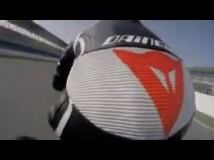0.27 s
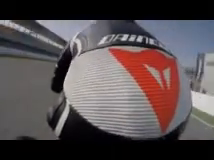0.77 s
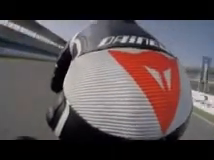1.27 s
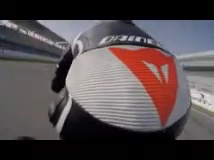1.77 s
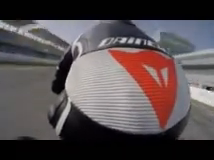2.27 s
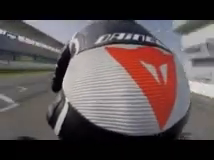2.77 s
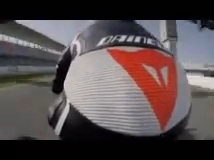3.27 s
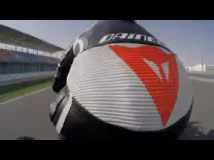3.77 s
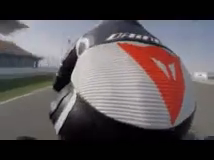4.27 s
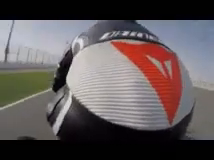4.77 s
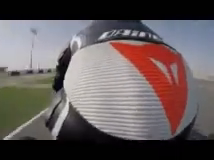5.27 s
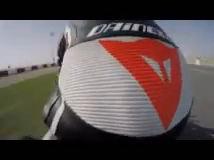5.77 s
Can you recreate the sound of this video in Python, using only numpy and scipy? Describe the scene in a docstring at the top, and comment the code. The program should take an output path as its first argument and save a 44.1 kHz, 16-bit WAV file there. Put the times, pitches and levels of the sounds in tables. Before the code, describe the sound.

A four-cylinder racing motorcycle runs flat out along a track straight, heard close from a microphone on its tail. From the start the engine holds a high, raspy scream that rises slightly, with roaring exhaust gas. Low, uneven wind thumps and mount vibration lie underneath throughout, along with a clutch hum, a faint chain whine and a light hiss of air. At about 0.9 seconds a quick upshift briefly cuts the note, the exhaust gives a sharp bang, and the engine returns at a lower pitch. From 1 to 5.5 seconds it pulls steadily, climbing very slowly with a slight wobble. At about 5.6 seconds the throttle shuts, then half reopens. The engine turns duller and burbles as its pitch falls, with short ringing tones flaring out. A softer bang comes at about 5.9 seconds as the wind grows stronger.

```python
"""A four-cylinder racing motorcycle speeds down a straight, heard from a microphone on its tail.
From the start, wind hisses and thumps, the rear wheel shakes the mount, the clutch hums, the chain
whines and gas roars, while the firing cylinders ring the exhaust pipes. Just before 1 s a quick
upshift cuts the ignition: the pitch drops, unburnt fuel bangs, and the revs slowly climb again.
At 5.6 s the throttle shuts, then half reopens; single tones flare as the revs fall, with one more bang."""
import sys
import numpy as np
from scipy import signal
from scipy.fft import rfft, irfft, next_fast_len
from scipy.io import wavfile

SR = 44100
rng = np.random.default_rng(int(sys.argv[2]) if len(sys.argv) > 2 else 0)


def wav_record(signal):
    """Record a signal, one row per channel, as 16-bit PCM in the file named by sys.argv[1]."""
    frames = np.transpose(np.atleast_2d(signal))
    bounded = np.clip(frames, -1, 1)
    # unit amplitude maps onto the largest positive 16-bit level
    quanta = np.round(bounded * 32767).astype(np.int16)
    wavfile.write(sys.argv[1], SR, quanta)


N = 265923
TIME = np.arange(N) / SR
FIRINGS = 4  # in one engine cycle, each cylinder fires once


def undb(db):
    """Turn decibels into a number to multiply by."""
    return 10 ** (np.asarray(db) / 20)


def curve(table, at=TIME):
    """Join a table's points with straight lines and read them off, by default over time."""
    return np.interp(at, *np.transpose(table))


def unit(x):
    """Scale a signal to an average size (rms) of 1."""
    return x / np.sqrt(np.mean(x ** 2))


def wander(rate):
    """A random drift of size 1 that heads for a new value rate times a second."""
    points = rng.standard_normal(2048)
    return unit(np.interp(TIME * rate, np.arange(len(points)), points))


def noise(spectrum):
    """Noise of size 1, shaped by points of (frequency [Hz], relative level [dB])."""
    hz, db = np.transpose(spectrum)
    size = next_fast_len(N)
    bins = np.maximum(np.fft.rfftfreq(size, 1 / SR), 1)
    gain = undb(np.interp(np.log(bins), np.log(hz), db))
    return unit(irfft(rfft(rng.standard_normal(size)) * gain, size)[:N])


def angle(hz):
    """The angle, in radians, of something that turns hz times a second."""
    return 2 * np.pi * np.cumsum(hz) / SR


# tone of the rushing air: (frequency [Hz], relative level [dB])
HISS_TONE = [(700, -24.5), (2000, -5.5), (3800, 3), (5500, -6.5), (6800, -7), (8300, -22)]

def air_hiss():
    """Air hisses steadily over the bike's bodywork."""
    return undb(-46) * noise(HISS_TONE)


# road speed, as turns of the rear wheel: (time [s], turning rate [Hz])
WHEEL_SPEED = [(0, 36.05), (.85, 37.9), (1.8, 38.05), (3.7, 39.68), (5.5, 40.5), (6.03, 40.16)]

def wheel_angle():
    """The rear wheel rolls along, setting the pace of the shaking and the chain."""
    return angle(curve(WHEEL_SPEED))


# strength of the wind and the mount's shaking, with a thump as the drive takes up after the shift near 0.92 s:
# (time [s], relative level [dB])
WIND_AND_SHAKE_LEVEL = [(0.0, -23.5), (.885, -23.5), (.925, -16), (.965, -26.5), (1.39, -23), (1.48, -18.5),
                        (1.58, -24), (2.47, -21.5), (2.69, -29.5), (2.74, -21), (3.01, -27.5), (3.06, -19),
                        (3.32, -28), (3.37, -24), (5.57, -21), (5.71, -19.5), (5.78, -30), (5.84, -18), (6.03, -15.5)]
# tone of wind on the microphone: (frequency [Hz], relative level [dB])
WIND_TONE = [(12, -29), (24, -11), (38, 4.5), (50, -3), (65, -3), (85, -7), (115, -7), (150, -23),
             (250, -38), (600, -86)]

def wind_and_shake(wheel):
    """Swirls of air hit the microphone while the rear wheel shakes its mount unevenly."""
    swirls = undb(-0.23 + 0.24 * wander(23)) * noise(WIND_TONE)
    sway = 1.1 * wander(8)
    shake = undb(-9.5 + 2 * wander(7.6)) * np.sin(wheel + sway)
    gust_db = -wander(9.5)
    return undb(curve(WIND_AND_SHAKE_LEVEL) + gust_db) * (swirls + shake)


def chain_whine(wheel, throttle, teeth=42):
    """The chain's rollers strike the teeth on the rear wheel fast enough to make a tone."""
    strength = undb(-38.5 + 2.4 * wander(17)) * throttle
    return strength * np.sin(teeth * wheel + 0.84 * wander(30))


# hum from the load on the clutch: (time [s], level [dB])
CLUTCH_LEVEL = [(0, -27.5), (.9, -27.5), (1.3, -24), (1.7, -26.5), (5.5, -29.5), (5.8, -26), (6.03, -36)]

def clutch_hum(cycle, turns_per_cycle=1.29):
    """The spinning clutch hums through the frame."""
    strength = undb(curve(CLUTCH_LEVEL) + 0.28 * wander(18)) * np.sqrt(2)
    return strength * np.sin(turns_per_cycle * cycle + 0.13 * wander(27))


# the rider's hand and the ignition cut: (time [s], throttle [0 shut to 1 open])
THROTTLE_MOVES = [(0, 0.88), (.826, 0.87), (.845, 0.08), (.904, 0.2), (.908, 0.81), (.96, 0.8), (2.5, 0.8),
                  (5.56, 0.87), (5.59, 0.6), (5.612, 0.1), (5.67, 0.28), (5.73, 0.5), (5.82, 0.4),
                  (5.88, 0.57), (5.98, 0.4), (6.03, 0.5)]

def throttle_opening():
    """How hard the engine is asked to pull."""
    return np.clip(curve(THROTTLE_MOVES), 0, 1)


# engine speed through two gears and the slowing at the end: (time [s], cycle rate [Hz])
ENGINE_REVS = [(0, 100.9), (.23, 101.3), (.4, 102.8), (.6, 102.9), (.76, 104.6), (.826, 104), (.884, 92.5),
               (.9, 87.5), (.922, 93.7), (.976, 91.6), (1.42, 92.8), (2, 93.8), (2.42, 94.85),
               (2.67, 94.85), (2.8, 95.6), (3.9, 96.8), (4.25, 97.75), (4.58, 98), (4.75, 98.9),
               (5.57, 99.9), (5.62, 95.4), (5.8, 94.1), (5.856, 91.2), (5.906, 86.9), (5.985, 79.7),
               (6.03, 77.5)]
# jolts to the springy drive: (time [s], first swing in cycle rate [Hz], wobble rate [Hz], fade time [s])
DRIVE_JOLTS = [(.98, -.8, 9.4, .35), (2.754, .8, 9.27, 1.3)]

def engine_speed():
    """Engine cycles per second, with a wobble that dies away after each jolt."""
    hz = curve(ENGINE_REVS)
    for start, swing_hz, wobble_hz, fade in DRIVE_JOLTS:
        age = np.maximum(TIME - start, 0)
        hz += (TIME >= start) * swing_hz * np.exp(-age / fade) * np.cos(2 * np.pi * wobble_hz * age)
    return hz


# bangs in the pipe: (time [s], level [dB], fade time [s])
FUEL_BANGS = [(.906, -17, .011), (5.912, -28, .025)]
# tone of a bang: (frequency [Hz], relative level [dB])
BANG_TONE = [(30, 0), (110, 1), (300, -1), (900, -3), (1400, -9), (2200, -5), (3700, -10.5),
             (6000, -24), (8000, -45)]

def fuel_bangs(rise_s=.0015):
    """Unburnt fuel goes off in the pipe with a short bark."""
    loudness = np.zeros(N)
    for start, db, fade in FUEL_BANGS:
        age = np.maximum(TIME - start, 0)
        loudness += undb(db) * np.minimum(age / rise_s, 1) * np.exp(-age / fade)
    return loudness * noise(BANG_TONE)


# strength of the gas flow: (time [s], relative level [dB])
GAS_LEVEL = [(0, -33.5), (.85, -34), (1.2, -33), (2.4, -34.5), (4.8, -33.5), (6.03, -32)]
# tone of the gas with the throttle open, and shut: (frequency [Hz], relative level [dB])
GAS_TONE_OPEN = [(150, -8), (280, -11), (450, -4.5), (900, -4.5), (1200, -7), (1500, -9.5), (1880, 3),
                 (2450, 0.5), (2900, -7), (3350, -15.5), (3850, -9), (4900, -19), (6300, -21.5),
                 (7200, -29.5), (8300, -41.5)]
GAS_TONE_SHUT = [(150, -8), (300, -8.5), (550, -9.5), (900, -2.5), (1300, -13.5), (1600, -12), (1950, -4.5),
                 (2400, -15.5), (2800, -21.5), (3900, -17), (5200, -39), (6200, -33), (8200, -60)]

def gas_roar(cycle, throttle):
    """Churning gas leaves in puffs, one per firing; it turns dull and burbles as the throttle shuts."""
    puffs = 1 + 0.2 * np.cos(FIRINGS * cycle) + 0.15 * np.cos(2 * cycle) + 0.046 * np.cos(cycle)
    gas = noise(GAS_TONE_OPEN)
    one_cycle_ago = np.interp(cycle - 2 * np.pi, cycle, gas, left=0)
    pulling = throttle * unit(gas + .4 * one_cycle_ago)  # each cycle partly repeats the last
    coasting = undb(2.5 + wander(70)) * (1 - throttle ** 2) * noise(GAS_TONE_SHUT)
    level_db = curve(GAS_LEVEL) + 8 - 11 * (1 - throttle) ** 2 + 0.49 * wander(25)
    return undb(level_db) * puffs * (pulling + coasting)


# An "order" is a tone at a whole number times the cycle rate. A resonance is a pitch a pipe rings at.
# All five tables list resonances: (frequency [Hz], width [Hz], relative level [dB])
# the silencer and tail pipe, shared by all orders
SILENCER = [(198, 63, -38), (532, 240, -36), (1554, 204, -45.5), (2700, 3600, -56.5), (3760, 110, -56),
            (4140, 210, -54)]
# where the pipes join, rung by all four cylinders in step (orders 4, 8, 12 ...)
PIPE_JOINT = [(748, 36, -30.5), (777, 35.4, -29), (831, 14, -31.5), (1098, 53, -34), (1253, 19, -41),
              (1473, 81, -41), (1620, 56, -36), (1904, 92, -24.5), (2077, 48, -34.5), (2266, 150, -34.5),
              (2610, 70, -42), (2790, 150, -43), (3664, 61, -44), (3840, 140, -46.5), (4310, 130, -46)]
# the front pipes, rung by the two cylinder pairs against each other (orders 1, 5, 9 ...)
PAIRS_OPPOSED = [(880.3, 74, -33.5), (896, 41, -32.5), (1329, 123, -36.5), (1600, 150, -47.5),
                 (1810, 36, -42), (1927, 26, -28), (2037, 75, -36.5), (2200, 100, -37.5), (2466, 97, -30.5),
                 (2555, 37, -42), (3820, 130, -51)]
# the front pipes, with the pairs in step (orders 2, 6, 10 ...)
PAIRS_IN_STEP = [(559, 29, -36), (938, 87, -31), (974, 42, -36), (1380, 69, -43.5), (1836, 132, -28),
                 (2008, 77, -31.5), (2285, 155, -32.5), (2449, 72, -30.5), (2615, 220, -39.5),
                 (3825, 150, -43)]
# the front pipes, with the pairs opposed the other way round (orders 3, 7, 11 ...)
PAIRS_REVERSED = [(277, 12, -42), (328, 11, -44), (646.5, 75, -33.5), (708, 34, -32), (1133, 140, -37),
                  (1820, 110, -37.5), (2110, 79, -33.5), (2231, 120, -31.5), (2410, 44, -39),
                  (2500, 56, -33.5), (2650, 160, -40), (3780, 191, -45.5)]

def pipe_gain(order, cycle_hz):
    """The pipes make an order louder as its pitch passes through one of their resonances."""
    pipes = (PIPE_JOINT, PAIRS_OPPOSED, PAIRS_IN_STEP, PAIRS_REVERSED)[order % FIRINGS]
    hz = np.linspace(50, 9000, 4096)
    power = 0
    for centre, width, db in [*SILENCER, *pipes]:
        off_centre = (hz / centre - centre / hz) * centre / width
        power += (undb(db) / (1 + off_centre ** 2)) ** 2
    return np.interp(order * cycle_hz, hz, np.sqrt(power))


# orders that ring out as the falling revs pass a resonance:
# (time [s], order [number], relative level [dB], half length [s])
ORDER_FLARES = [(.85, 8, -27, .014), (.875, 8, -31, .012), (.862, 10, -32, .014), (5.738, 8, -25, .026),
                (5.76, 12, -35, .06), (5.73, 16, -37.5, .05), (5.85, 22, -31, .022), (5.885, 18, -35, .02),
                (5.935, 8, -31, .035), (5.984, 24, -24, .016)]

def exhaust_tones(cycle_hz, cycle, throttle):
    """Exhaust pulses make a stack of orders, all trembling because no two firings are alike."""
    shut = 1 - throttle
    trembles = [wander(45) for _ in range(7)]
    # weak but sharp pulses at half throttle bring out the firing note's overtones
    octave_lift_db = 20 * throttle * shut
    burble = wander(220)
    tones = np.zeros(N)
    for order in range(1, 64):
        if order % FIRINGS == 0:
            strength = undb(-13.8 * shut + octave_lift_db * 2 * FIRINGS / order)
            tremble_depth = 0.04
        else:  # unequal cylinders fill in the orders in between
            strength = undb(1.6 - 15.2 * shut if order % 2 else 1.46 - 13 * shut)
            tremble_depth = 0.04 + 0.08 * shut
        strength *= pipe_gain(order, cycle_hz)
        for peak_s, flare_order, db, half_length in ORDER_FLARES:
            if flare_order == order:
                flare = undb(db) * np.exp(-((TIME - peak_s) / half_length) ** 2 / 2)
                strength = np.hypot(strength, flare * (1 + .45 * burble))
        # low orders leave the pipe late, as a falling chirp; high ones leave together, as a crack
        chirp_order = min(order, 13)
        phase = .32 * chirp_order * (2 * order - chirp_order) + .045 * order * rng.standard_normal()
        if order != FIRINGS:  # firing_note plays this one
            tremble = 1 + tremble_depth * trembles[order % len(trembles)]
            tones += strength * tremble * np.sin(order * cycle + phase)
    return tones


# the firing note grows as it nears the pipe's main resonance: (pitch [Hz], relative level [dB])
NOTE_LEVEL = [(335, -33), (366, -20.5), (385, -20), (398, -18.5), (410, -17), (420, -16.5)]

def firing_note(cycle_hz, cycle, throttle):
    """Four firings a cycle blend into the engine's clear main note, which fades as the throttle shuts."""
    level_db = curve(NOTE_LEVEL, at=FIRINGS * cycle_hz) - 25 * (1 - throttle)
    return undb(level_db) * (1 + 0.061 * wander(60)) * np.sin(FIRINGS * cycle)


def scene():
    """Exhaust, clutch, chain and wind, all travelling with the microphone."""
    cycle_hz = engine_speed()
    throttle = throttle_opening()
    wheel = wheel_angle()
    # firing times scatter a little, much more with the throttle shut
    cycle = angle(cycle_hz) + (.003 + .065 * (1 - throttle) ** 2) * wander(110)
    engine = exhaust_tones(cycle_hz, cycle, throttle) + firing_note(cycle_hz, cycle, throttle)
    exhaust = np.sqrt(2) * engine + gas_roar(cycle, throttle) + fuel_bangs()
    drive = clutch_hum(cycle) + chain_whine(wheel, throttle)
    return (exhaust + drive + wind_and_shake(wheel) + air_hiss())[None]


def record(dry):
    """The microphone rounds off the loudest peaks and cuts the treble above 8400 Hz."""
    rounded = np.tanh(1.158 * dry) / 1.111
    return signal.sosfilt(signal.ellip(8, .2, 70, 8400, fs=SR, output="sos"), rounded)


dry = scene()
out = record(dry)
wav_record(out)
```